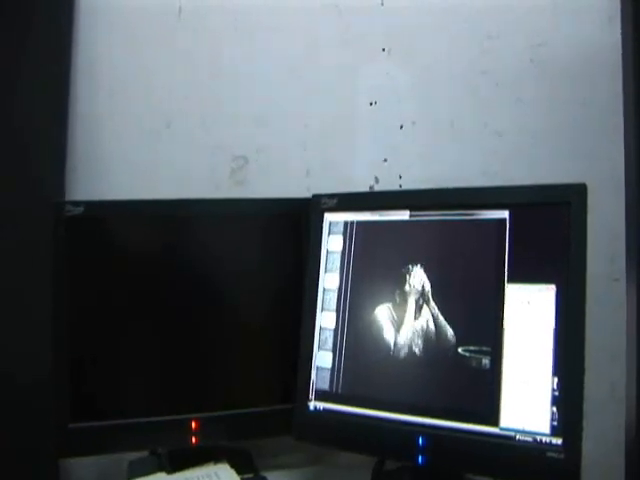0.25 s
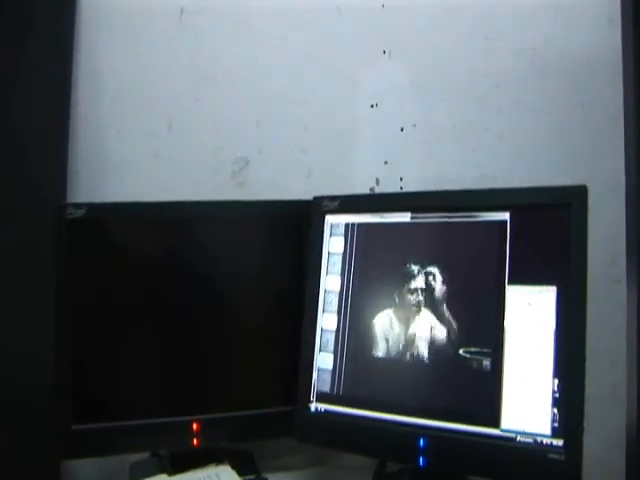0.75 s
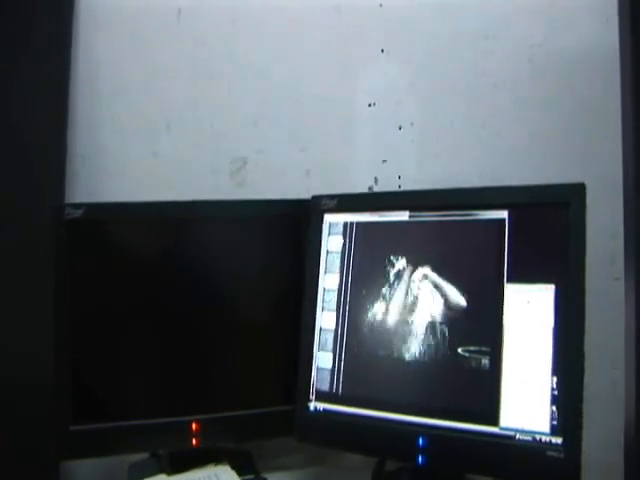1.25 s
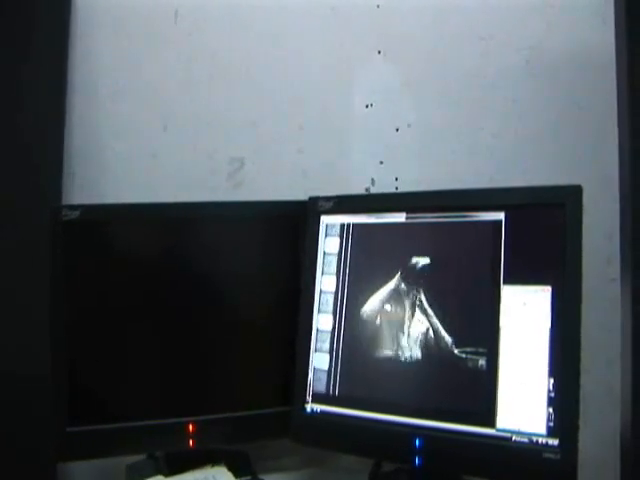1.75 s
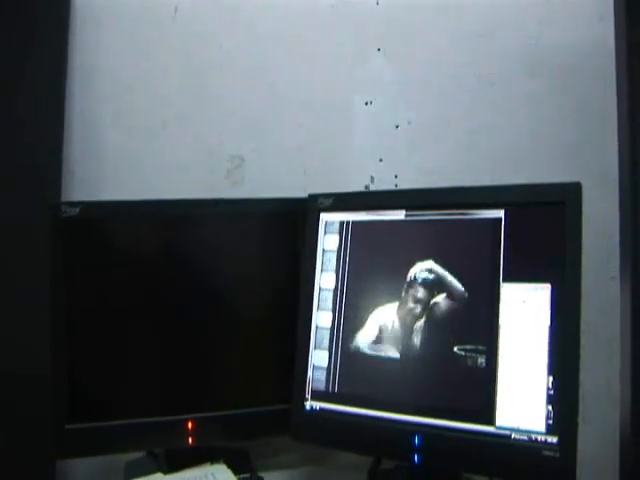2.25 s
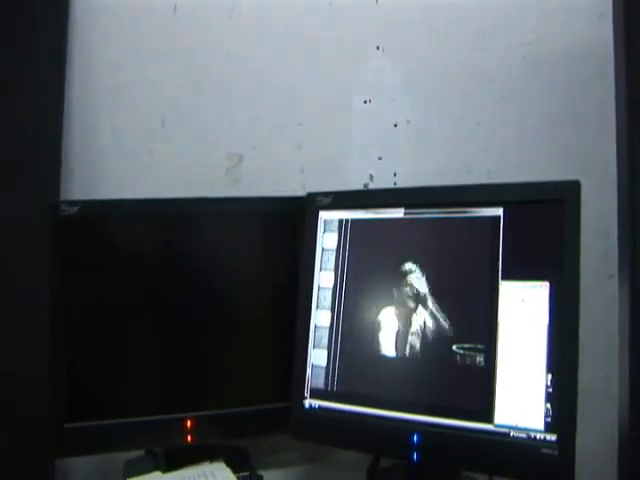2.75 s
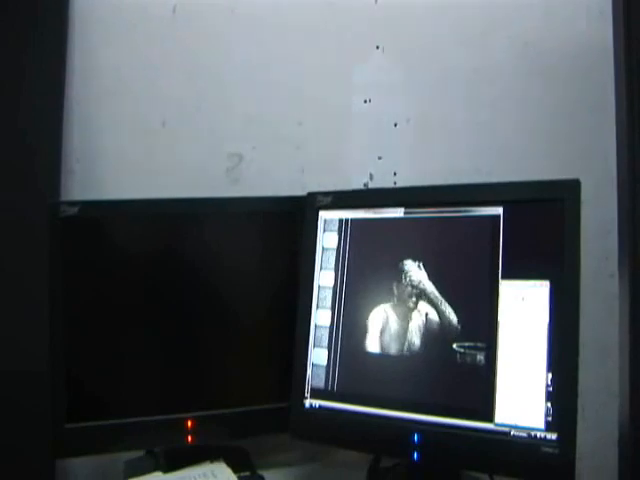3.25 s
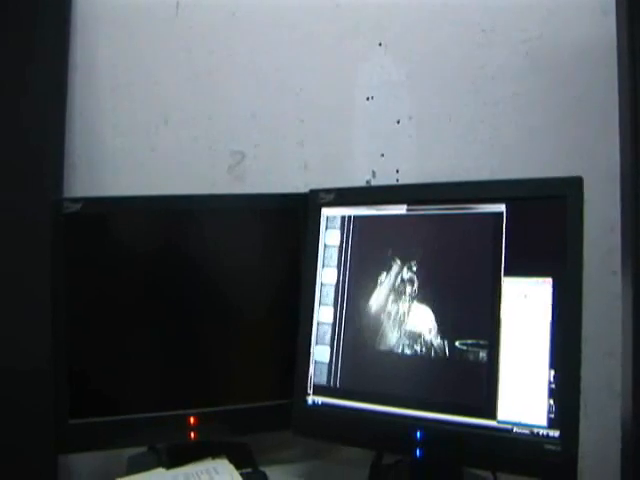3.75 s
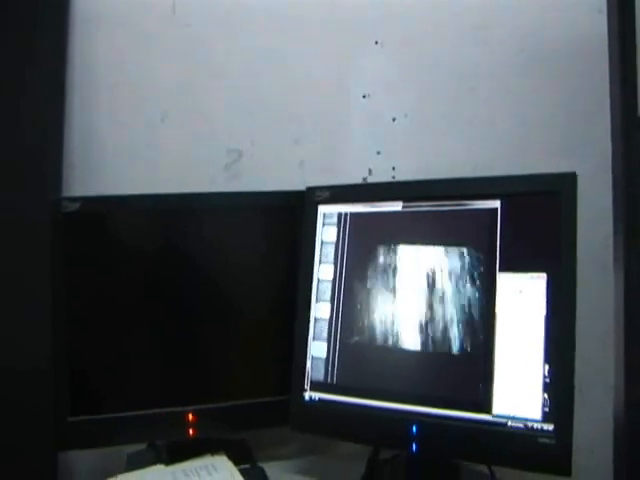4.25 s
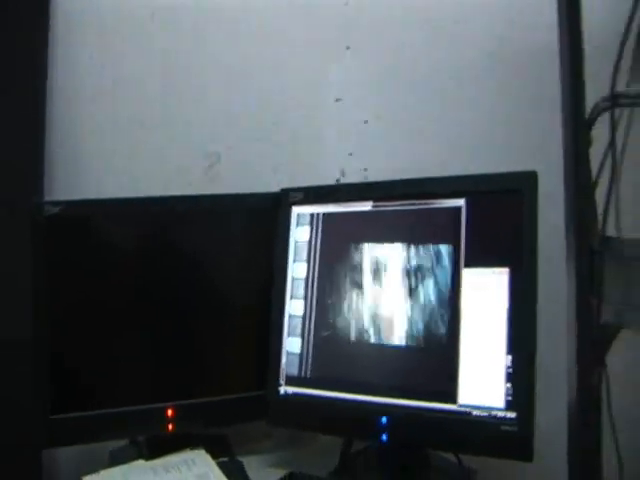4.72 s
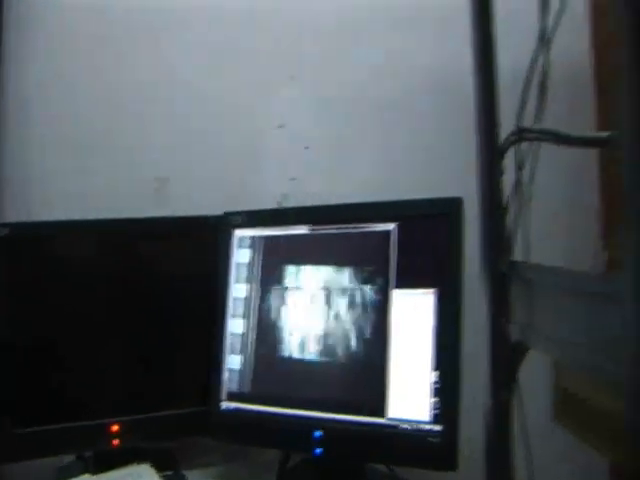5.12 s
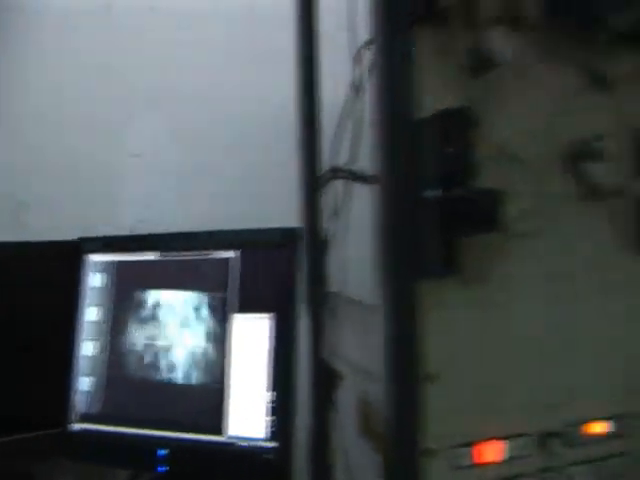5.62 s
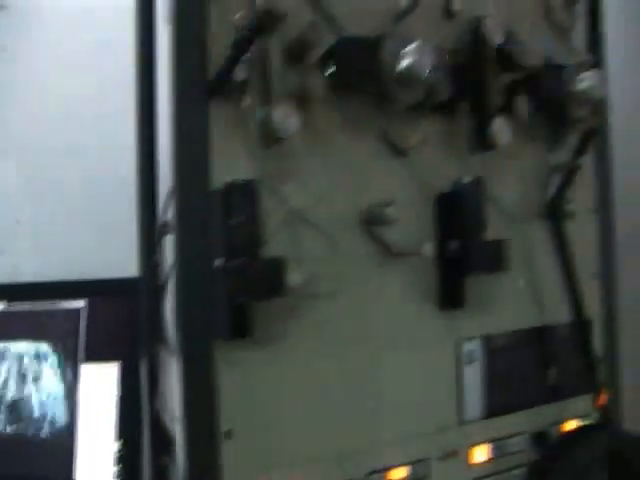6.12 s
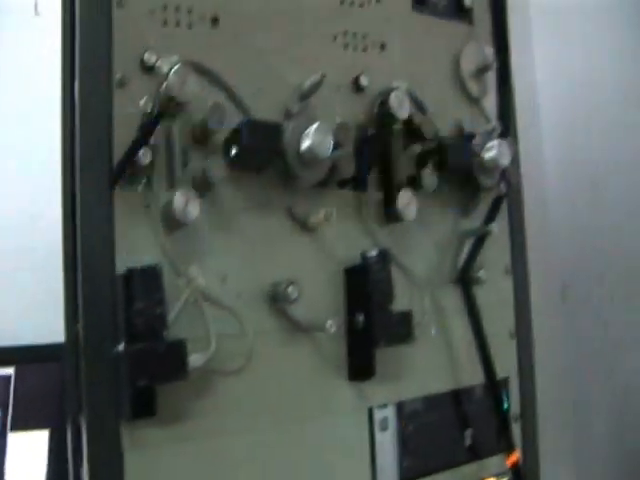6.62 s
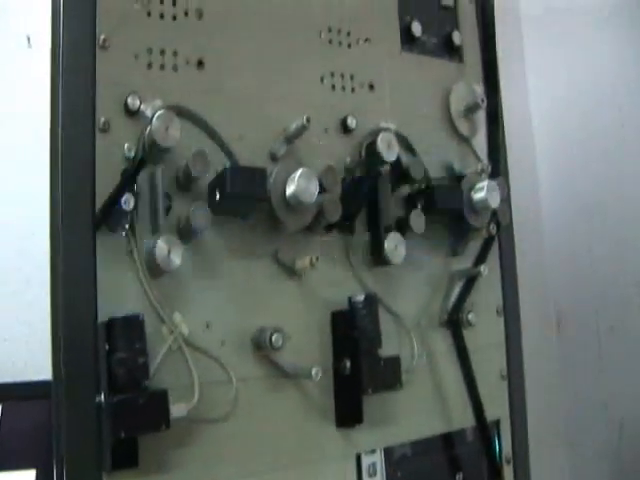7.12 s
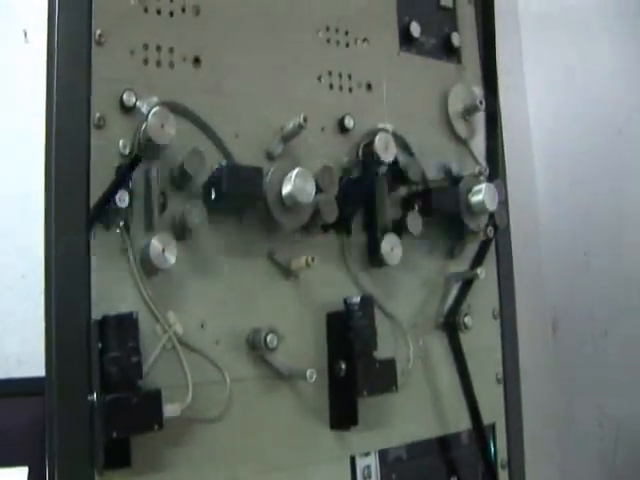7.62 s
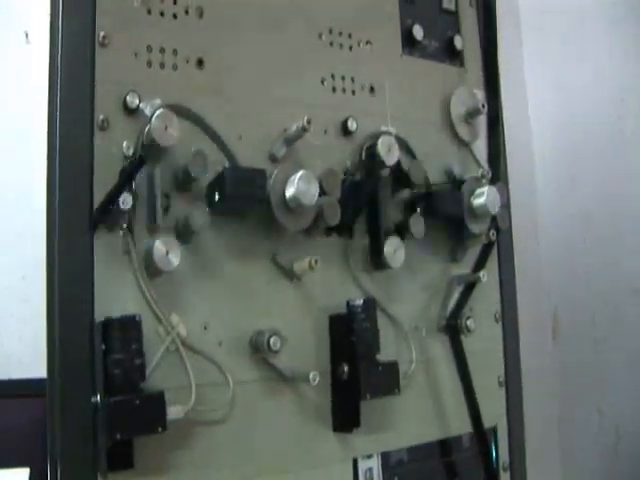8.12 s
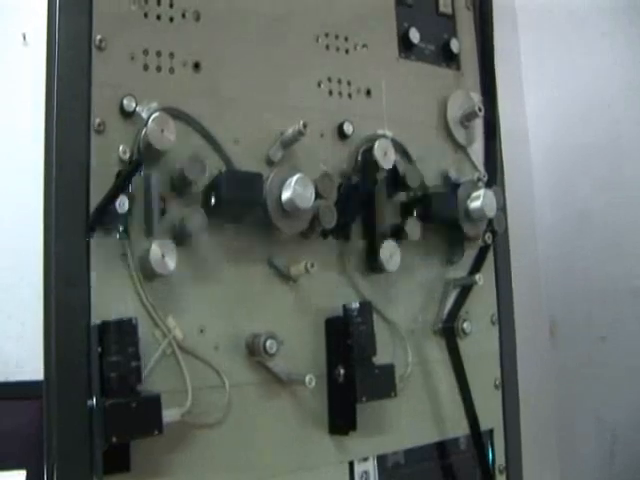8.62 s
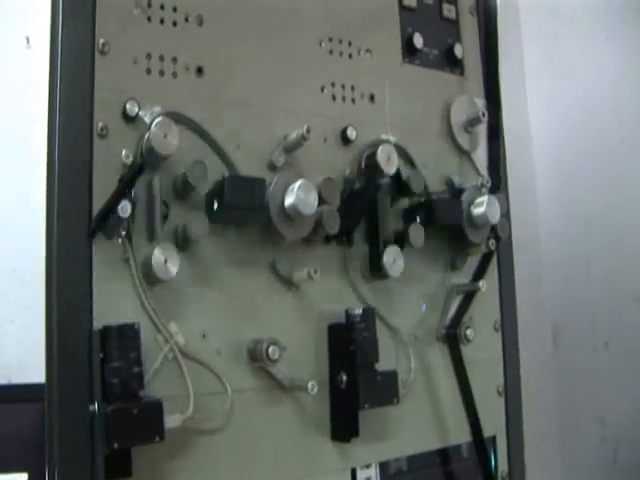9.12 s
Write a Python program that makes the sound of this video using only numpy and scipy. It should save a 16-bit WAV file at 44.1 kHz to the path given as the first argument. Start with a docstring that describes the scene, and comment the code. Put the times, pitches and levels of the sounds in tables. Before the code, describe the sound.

A film scanner runs continuously in a small room. A low motor hum near 100 Hz, gently wavering with rotating overtones, sits under a broad rush of cooling fans and a thin high hiss. The clip opens on the tail of a rasp, with a tiny squeak and scrape at 0.3. Then film is pulled through the gate in clusters of two or three dry, hissing swishes, the last usually strongest: about 1.0-1.3, 2.4-2.6, 3.7-3.9, 5.0-5.2, 6.3-6.5, 7.6-7.8 and 8.9-9.1 seconds. Fainter scrapes and ticking squeaks follow about 0.4 seconds later as the loop settles. From 4.3 to 6.8 the hand-held stereo microphone turns toward the machine; rasps grow slightly crisper, a faint mid fan whine emerges, and short chirps stand out, notably at 5.1, 6.5, 7.7 and 9.1. The hum and air continue to the end.

```python
"""A steady motor hum with shaft sidebands and a rush of fans fill a small room: a film scanner runs. Once
a cycle it drags film through the gate in two or three rasping swishes and a smaller one as the loop settles;
the film edge squeaks. Hum and squeaks are sines, fans and film are coloured noise through resonances.
A hand-held camera with two close microphone ports turns from the desk toward the machine."""
import sys
import numpy as np
from scipy import signal
from scipy.fft import rfft, irfft, next_fast_len
from scipy.io import wavfile
from scipy.ndimage import uniform_filter1d, map_coordinates

SR = 44100
rng = np.random.default_rng(int(sys.argv[2]) if len(sys.argv) > 2 else 0)


def generate_wav(sig):
    """Save sig (samples, or channels by samples) to the path in sys.argv[1] as 16-bit PCM at SR."""
    pcm = np.round(np.clip(np.atleast_2d(sig).T, -1, 1) * 32767).astype(np.int16)
    wavfile.write(sys.argv[1], SR, pcm)


N = 413216

COARSE = 16  # low tones are made at every 16th sample

# Strokes of film through the gate; each cycle creeps in, pulls and settles.
# Each row: time of the rasp's full strength in seconds, rise in seconds, hold in seconds,
# rasp level in dB, hiss level in dB.
STROKES = [ (0.004, 0.024, .001, -28.5, -48), (0.286, 0.032, .001, -42, -41.5),
           (0.34, 0.045, .015, -34, -44), (0.683, 0.074, .07, -59, -54), (0.878, .2, 0.051, -49.5, -58),
           (0.961, .01, .04, -39.5, -57), (1.044, 0.041, 0.044, -33.5, -34),
           (1.165, 0.077, 0.02, -33.5, -36.5), (1.26, 0.089, .008, -27.5, -31),
           (1.632, 0.1, .015, -41, -42.5), (1.665, .006, .002, -39, -54), (1.697, .03, .005, -43, -61),
           (1.74, .03, .005, -45.5, -65), (1.87, .01, .002, -65, -53), (2.158, 0.06, 0.065, -44.5, -50),
           (2.285, .007, .02, -39, -46), (2.363, 0.066, .005, -32.5, -34),
           (2.483, 0.034, 0.028, -34.5, -32.5), (2.57, 0.1, 0.012, -26, -30.5),
           (2.912, 0.05, .005, -50, -46), (2.935, 0.009, 0.036, -36.5, -39),
           (3.009, 0.064, 0.031, -37.5, -44), (3.453, 0.051, .11, -46, -52),
           (3.562, .015, 0.047, -40.5, -46), (3.667, 0.035, .005, -29, -30.5),
           (3.795, 0.041, .03, -32, -32.5), (3.886, 0.086, .005, -26, -30.5),
           (4.272, 0.1, 0.028, -40.5, -46), (4.327, 0.098, 0.0092, -41.5, -44.5),
           (4.792, 0.15, 0.024, -45, -48.5), (4.9, 0.091, .003, -37, -45),
           (4.984, 0.045, .005, -29.5, -30.5), (5.111, 0.042, 0.016, -30, -30),
           (5.172, 0.045, 0.042, -27, -30.5), (5.587, 0.084, .003, -35, -36.5),
           (5.64, .05, .005, -38.5, -42), (5.784, 0.055, .005, -48.5, -49), (6.057, .015, 0.0028, -47, -54),
           (6.144, 0.11, .04, -43, -65), (6.213, 0.037, 0.0022, -34, -57),
           (6.296, 0.034, .001, -25.5, -30.5), (6.417, .01, 0.045, -29, -34),
           (6.502, 0.11, 0.019, -24.5, -32), (6.723, .05, .005, -49, -49), (6.846, 0.02, .015, -37.5, -48),
           (6.892, .008, .012, -33, -41.5), (7.383, .015, .02, -48, -51), (7.41, .02, 0.045, -46, -51),
           (7.512, 0.048, 0.0032, -36.5, -47), (7.607, 0.036, .003, -25.5, -31),
           (7.728, .004, 0.033, -29, -31.5), (7.819, 0.097, 0.014, -23.5, -31),
           (8.035, .05, .005, -45, -51), (8.16, 0.059, .03, -45, -51), (8.222, .06, .003, -36.5, -43.5),
           (8.274, .04, 0.027, -42.5, -49), (8.766, 0.11, 0.02, -40.5, -49), (8.812, .02, .07, -39, -50),
           (8.928, 0.035, .003, -26.5, -31), (9.051, 0.013, 0.035, -28.5, -34),
           (9.125, 0.051, 0.039, -24.5, -31.5), (9.368, 0.043, .001, -44, -60)]


def amp(db):
    """Gain of a level in dB."""
    return np.exp(np.asarray(db) * np.log(10) / 20)


def unit(x):
    """x at rms 1."""
    return x / np.sqrt(np.mean(x ** 2) + 1e-20)


def along(points, hz):
    """A curve through (Hz, value) points, read on a log frequency axis."""
    f, v = np.transpose(points)
    return np.interp(np.log(hz + 1), np.log(f + 1), v)


def curves(rows):
    """One value per sample for each column after the time."""
    s, *cols = np.transpose(rows)
    return [np.interp(np.arange(N) / SR, s, c) for c in cols]


def wobble(rate, step=1):
    """A smooth random curve, rate knots a second, read at every step-th sample."""
    at = np.arange(0, N + 64, 64)
    knots = rng.standard_normal(int(N * rate / SR) + 5)
    smooth = map_coordinates(knots, [at * rate / SR])
    return np.interp(np.arange(0, N, step), at, smooth)


def filtered(x, response):
    """x times a response of frequency."""
    m = next_fast_len(N + SR // 2)
    hz = np.fft.rfftfreq(m, 1 / SR)
    return irfft(rfft(x, m) * response(hz), m)[..., :N]


def lift(modes, hz):
    """Summed dB lift of resonances, each a centre in Hz, a width in Hz and a lift in dB."""
    return sum(db / (1 + ((hz - centre) / (width / 2)) ** 2) for centre, width, db in modes)


def rush(colour_db, patchy_db, modes=(), drift=0):
    """Stereo noise of rms 1 at the two ports: patches of random gain, resonances that wander and swell."""
    # Two close ports in a diffuse field. Each row: frequency in Hz, left-right likeness from -1 to 1.
    alike = [(30, .99), (92, 1), (140, 1), (210, 0.9), (330, 0.8), (500, 0.51), (770, 0.23), (1170, 0.54),
             (1790, 0.47), (3000, 0.88), (3800, 0.53), (4500, -0.33), (6300, -0.62), (7500, -0.56),
             (9300, -0.47), (10500, 0.63), (12000, 0.52), (13500, -0.094)]
    hz, _, z = signal.stft(rng.standard_normal((2, N)), SR, nperseg=1024)
    patches = uniform_filter1d(rng.standard_normal(z.shape[1:]), size=3, axis=0)
    patches = uniform_filter1d(patches, size=4, axis=1)
    moving = []
    for centre, width, db in modes:
        wandering = centre * (1 + drift * wobble(9, step=512))
        swelling = db * (1 + .24 * wobble(7, step=512))
        moving.append((wandering, width, swelling))
    gain_db = patchy_db * unit(patches)
    gain_db[:, :N // 512 + 1] += lift(moving, hz[:, None])
    pair = signal.istft(z * amp(gain_db), nperseg=1024)[1][:, :N]

    def mid_side(hz):
        angle = np.arccos(np.clip(along(alike, hz), -1, 1)) / 2
        return amp(colour_db(hz)) * [np.cos(angle), np.sin(angle)]

    mid, side = filtered(pair, mid_side)
    return unit(np.array([mid + side, mid - side]))


def tone(phase, spread, waver_db):
    """A low sine whose level wanders about rms 1; the room shifts its phase between the ports."""
    ports = np.array([[spread], [-spread]])  # radians
    return np.sqrt(2) * amp(waver_db * wobble(5, step=COARSE)) * np.sin(phase[::COARSE] + ports)


def turned(away_db, facing_db):
    """A gain that follows the camera's turn."""
    # Each row: time in seconds, how far the camera faces the machine from 0 to 1.
    facing = [(0, 0.05), (4.3, 0.05), (5.2, 0.28), (6.1, 0.85), (6.8, 1), (9.37, 0.86)]
    return amp(away_db + (facing_db - away_db) * np.clip(curves(facing)[0], 0, 1))


def motor():
    """Magnetic hum and overtones flanked by multiples of the shaft speed; the far tones waver more."""
    # Motor tones. Each row: hum multiple, shaft multiple, level in dB facing away, level in dB facing it.
    partials = [(1, -1, -55, -53), (1, 0, -39, -35), (1, 1, -55, -61), (1, 2, -58, -56), (1, 3, -62, -63),
                (2, -2, -59, -64), (1, 5, -54.5, -67), (2, -1, -67, -60), (2, 0, -54, -60),
                (1, 7, -55, -69), (2, 1, -68, -63), (1, 8, -53, -68), (2, 2, -67, -58), (1, 9, -64, -70),
                (2, 3, -68, -60), (3, -2, -62, -61), (2, 5, -50.5, -53), (3, 0, -61, -59), (3, 1, -55, -57),
                (3, 2, -69, -66), (4, -2, -66, -67), (4, -1, -68, -70), (4, 0, -59, -62), (4, 2, -63, -70),
                (4, 3, -64, -67)]
    # A low tone that comes and goes. Each row: time in seconds, level in dB.
    drone = [(0.1, -49), (0.63, -52), (1.12, -50), (2.67, -56), (2.75, -62), (3.72, -51), (4.05, -70),
             (4.25, -62), (4.99, -66), (5.3, -59), (5.6, -55), (6.09, -71), (6.14, -62), (7.08, -57),
             (7.44, -73), (8.18, -65), (8.69, -55), (9.25, -54)]
    # A fan tone. Each row: time in seconds, level in dB.
    whine = [(0, -65), (6.5, -61.5), (6.75, -55.5), (9.37, -56.5)]
    hum_hz, shaft_hz = 98.03, 15.99
    turn = 2 * np.pi * np.arange(N) / SR  # phase of 1 Hz
    hum = hum_hz * turn + 0.11 * wobble(3.05)
    shaft = shaft_hz * turn + 0.17 * wobble(2.96)
    drone_phase = 47.0 * turn + .3 * wobble(2.8)
    whine_phase = 463.2 * turn + .5 * wobble(4)
    out = amp(curves(drone)[0][::COARSE]) * tone(drone_phase, spread=-0.03, waver_db=0.0)
    out = out + amp(curves(whine)[0][::COARSE]) * tone(whine_phase, spread=.3, waver_db=1.2)
    for k, m, away_db, facing_db in partials:
        loose = abs(k - 1 + m * shaft_hz / hum_hz)  # distance from the main hum
        flip = np.pi * (m < 0)  # uneven rotation bends pitch more than level: lower sidebands turn over
        sine = tone(k * hum + m * shaft + flip, spread=-.009 + .08 * loose, waver_db=.3 + .45 * loose)
        out = out + turned(away_db, facing_db)[::COARSE] * sine
    return signal.resample_poly(out, COARSE, 1, axis=1, padtype="line")[:, :N]


def fans():
    """Steady cooling air: a broad rush in the cabinet and a thin hiss that leans right."""
    # Colour of the broad rush. Each row: frequency in Hz, relative level in dB per Hz.
    air = [(20, -26), (56, -26), (68, -23), (80, -15.5), (130, -11), (165, -18.5), (213, -21), (250, -20.5),
           (340, -17), (430, -17.5), (650, -20.5), (900, -19), (1490, -22), (2330, -27.5), (3510, -27),
           (4300, -30), (5000, -32.5), (6000, -33.5), (6600, -45), (7500, -105)]
    # Colour of the thin hiss. Each row: frequency in Hz, relative level in dB per Hz.
    fizz = [(5000, -43), (7000, -39), (9000, -13), (12000, 0.5), (14000, 0.5), (15400, 2)]
    # Cabinet resonances. Each row: frequency in Hz, width in Hz, lift in dB.
    casing = [(28, 8, 2), (220, 78, 9), (279.4, 11, 10), (394, 15, 6.5), (418, 23, 4.5), (495, 20, 3.5),
              (728, 14, 6.5), (983, 43, -4), (1046, 154, 4), (1003, 14, 8)]
    # Air whistling in the vents. Each row: mean frequency in Hz, width in Hz, mean lift in dB.
    vents = [(2220, 140, 5.5), (3430, 200, 4), (5150, 260, 9)]
    # drift is a share of the resonance's pitch
    body = rush(lambda hz: along(air, hz) + lift(casing, hz), patchy_db=0.8, modes=vents, drift=0.018)
    body = turned(away_db=-42.5, facing_db=-41.5) * body
    lean = np.array([turned(-1.1, -.2), turned(2.3, .2)])  # left, right; evens out facing the machine
    thin = lean * rush(lambda hz: along(fizz, hz), patchy_db=1.3)
    return body + turned(away_db=-49, facing_db=-52.5) * amp(0.59 * wobble(6)) * thin


def stroked(level_db, fade, late, idle_db, steeper=1):
    """Gain over time of all strokes: a climb, a hold, a quick release and the room's slower tail."""
    rise_db = 15  # climb within a stroke's rise time, before steeper
    let_go, room_db, dies = fade  # contact release in dB/s, the room's share in dB, its decay in dB/s
    at = np.arange(0, N + 64, 64)
    s, rise, hold = np.transpose(STROKES)[:3, :, None]
    t = at / SR - s - late
    after = np.maximum(t - hold, 0)
    share = amp(room_db) ** 2
    power = amp(level_db[:, None] + steeper * rise_db * np.minimum(t, 0) / rise) ** 2
    power = power * ((1 - share) * amp(-let_go * after) ** 2 + share * amp(-dies * after) ** 2)
    resting = amp(idle_db + 2.2 * wobble(9.6)) ** 2  # film in the gate between strokes flickers in level
    return np.sqrt(np.interp(np.arange(N), at, power.sum(axis=0)) + resting)


def film():
    """Sliding friction excites the gate plate and the deck; stick and slip make the rasp uneven."""
    # Colours of the rasp, the deck's rumble and the hiss.
    # Each row: frequency in Hz, relative level in dB per Hz.
    rasp_colour = [(900, -22), (1500, -19), (2000, -1), (2460, -3), (3020, -1.5), (3700, -7.5), (4920, -9),
                   (6900, -20.5), (9000, -51)]
    deck_colour = [(350, -15), (600, -10), (900, -6.5), (1300, 4), (1600, -2), (2200, -12)]
    hiss_colour = [(3500, -85), (5000, 12.5), (6900, 1), (8500, 5.5), (11000, 0), (13000, 3), (14300, 2),
                   (15400, 1)]
    # Gate plate resonances. Each row: mean frequency in Hz, width in Hz, mean lift in dB.
    gate = [(796, 33, 13), (945, 37, 7), (1170, 55, 5.5), (1395, 45, 4.5), (1616, 42, 9), (1772, 100, 9),
            (2040, 37, 3.5), (2350, 33, 4), (2466, 39, 8.5), (2930, 50, 2.5), (3290, 56, 3.5),
            (4100, 110, 5), (4860, 83, 6)]
    # Deck rumble against the rasp, cycle by cycle. Each row: time in seconds, level in dB.
    deck_level = [(0.2, -4), (1.2, -4.5), (2.5, -6.5), (3.8, -5), (5.1, -5), (6.4, -8), (7.7, -8.5),
                  (9.1, -8.5)]
    *_, rasp_db, hiss_db = np.transpose(STROKES)
    slip_db = 0.5 * wobble(45) + 0.5 * wobble(170)

    rasp = rush(lambda hz: along(rasp_colour, hz), patchy_db=1.4, modes=gate, drift=0.01)
    rasp = stroked(rasp_db, fade=(187, -3, 83), late=0, idle_db=-65) * amp(slip_db) * rasp

    # the deck answers late
    deck = rush(lambda hz: along(deck_colour, hz), patchy_db=2.0, modes=gate, drift=0.01)
    deck_gain = stroked(rasp_db, fade=(210, -1.5, 96), late=0.0038, idle_db=-65)
    deck = deck_gain * amp(curves(deck_level)[0]) * deck

    # the hiss peaks early and climbs faster than the rasp
    hiss = rush(lambda hz: along(hiss_colour, hz), patchy_db=1.8)
    hiss_gain = stroked(hiss_db, fade=(170, -1, 158), late=-0.011, idle_db=-65, steeper=1.33)
    return rasp + deck + hiss_gain * amp(.9 * slip_db) * hiss


def squeaks():
    """The edge catches with a tick, sings a fluttering, gliding tone, then rings out in the room."""
    # The film edge squeaks on a guide. Each row: start in seconds, level in dB, pitch in Hz,
    # length before the ring-out in seconds, glide in Hz per second.
    catches = [(0.279, -39.5, 2420, 0.012, 0), (0.96, -50, 2640, 0.015, 0), (1.626, -40, 2450, 0.036, 0),
               (1.626, -46, 4900, .015, 0), (1.643, -39, 3050, .008, 0), (2.277, -40, 2915, 0.058, 0),
               (2.277, -42, 2110, .02, 0), (2.487, -42, 2400, .025, -2000), (2.915, -46, 4850, .006, 0),
               (2.934, -38, 2400, 0.03, 0), (2.935, -39, 3060, 0.015, 0), (2.935, -44, 3500, .035, -1500),
               (3.57, -45, 3110, 0.029, 0), (3.605, -45, 2880, .025, 0), (3.796, -44, 2420, .025, -2000),
               (4.250, -39.5, 2420, 0.032, 600), (4.881, -41, 2920, 0.053, -300),
               (4.967, -40, 2920, 0.06, 800), (5.115, -35, 2364, 0.058, 3495),
               (5.172, -32.5, 2460, 0.033, -1500), (5.57, -35, 2390, 0.045, 3198),
               (6.056, -45, 2620, .005, 0), (6.19, -37.5, 2850, 0.03, 800), (6.41, -40, 2450, .03, 0),
               (6.43, -40, 4050, 0.07, 0), (6.512, -24.5, 2350, 0.005, 0), (6.887, -39, 2470, 0.04, 0),
               (6.883, -37.5, 3050, 0.027, 2000), (6.932, -43, 3140, 0.034, 0), (6.972, -43, 2480, .015, 0),
               (7.369, -45, 3950, 0.008, 2), (7.37, -45, 2640, 0.014, 0), (7.408, -44, 2350, .012, 0),
               (7.428, -41, 2600, 0.012, 6000), (7.452, -39, 3000, .006, 0),
               (7.508, -42, 3000, 0.02, -3000), (7.54, -38, 2550, 0.008, 0), (7.577, -41, 2320, 0.017, 10),
               (7.726, -28.5, 2540, 0.03, -3500), (7.737, -35.5, 4040, 0.022, 1500),
               (8.193, -47, 2430, .015, 0), (8.213, -36, 2433, .03, 500), (8.214, -37.5, 2730, 0.014, 0),
               (8.752, -41, 2600, 0.027, -2500), (8.759, -45, 3060, 0.027, 0), (8.81, -44, 2140, .02, 0),
               (8.92, -45, 3140, .02, 0), (9.052, -46, 1940, .02, 0), (9.115, -29.5, 2400, 0.03, 0),
               (9.152, -30, 2500, 0.01, 0)]
    out, t = np.zeros(N + SR), np.arange(SR // 5) / SR
    tick_band = signal.butter(2, [1800 / SR * 2, 4000 / SR * 2], "band")
    for s, db, hz, length, glide in catches:
        flutter = unit(uniform_filter1d(rng.standard_normal((2, len(t))), size=200, axis=1))
        cycles = np.cumsum(hz + glide * np.minimum(t, length)) / SR
        ring = (1.35 + .45 * flutter[0]) * np.sin(2 * np.pi * cycles + .45 * flutter[1])
        attack = 1 - np.exp(-t / 0.00078)
        ring_out = amp(-60 * np.maximum(t - length, 0) / 0.091)  # 60 dB in 91 ms
        tick = unit(signal.lfilter(*tick_band, rng.standard_normal(len(t))))
        tick = 0.84 * amp(-60 * t / 0.051) * tick
        out[round(s * SR):][:len(t)] += amp(db) * (ring_out * attack * ring + tick)
    return out[:N]


def scene():
    """All sources at the two ports."""
    return motor() + fans() + film() + squeaks()


def record(dry):
    """The ports differ a little in colour and phase; nothing passes above the band limit."""
    # Each row: frequency in Hz, left above right in dB.
    level_lean = [(300, -0.2), (1400, -0.7), (3000, -1), (4500, 1), (9500, -1.2), (13000, -0.5)]
    # Each row: frequency in Hz, left trailing right in radians.
    phase_lag = [(500, 0.015), (1500, 0.14), (2600, 0.28), (4000, 0.19), (9000, 0.096), (13000, 0.7)]
    top_hz = 15450

    def port(hz):
        colour = amp(np.outer([.5, -.5], along(level_lean, hz)))
        phase = np.exp(np.outer([-.5j, .5j], along(phase_lag, hz)))
        return colour * phase * (hz < top_hz)

    return filtered(dry, port)


dry = scene()
out = record(dry)
generate_wav(out)
```